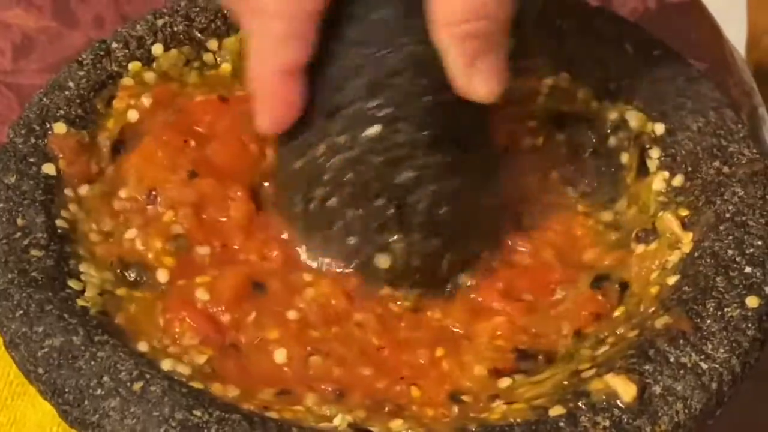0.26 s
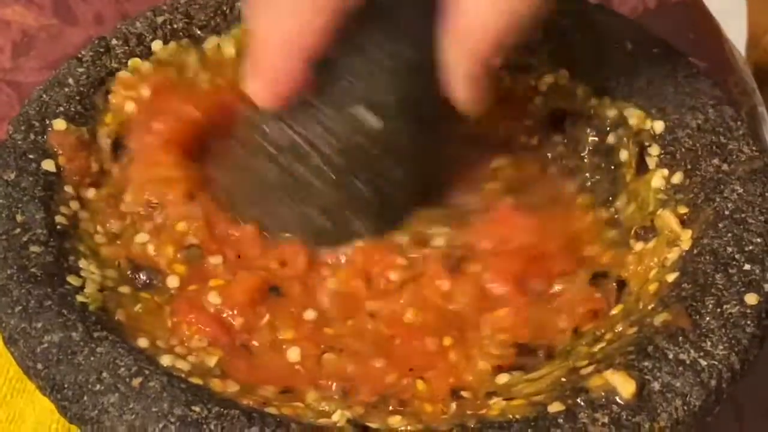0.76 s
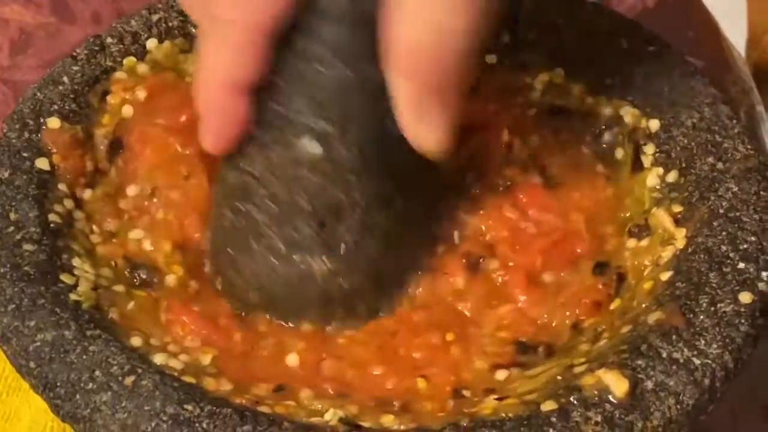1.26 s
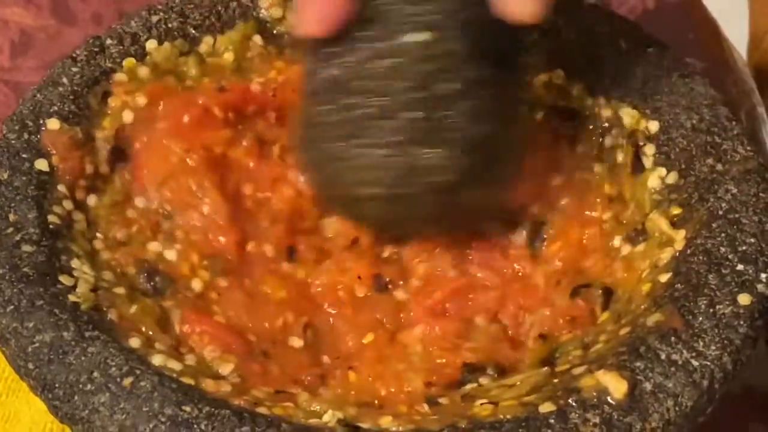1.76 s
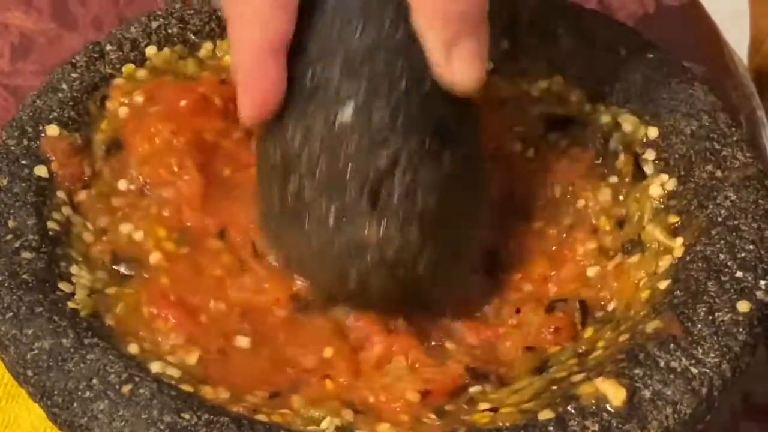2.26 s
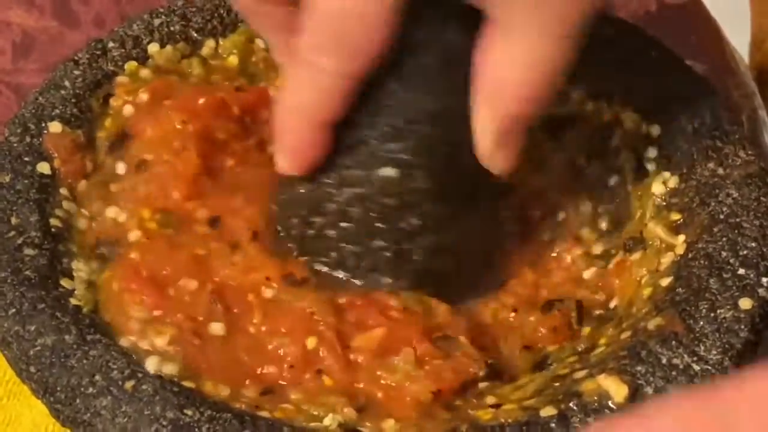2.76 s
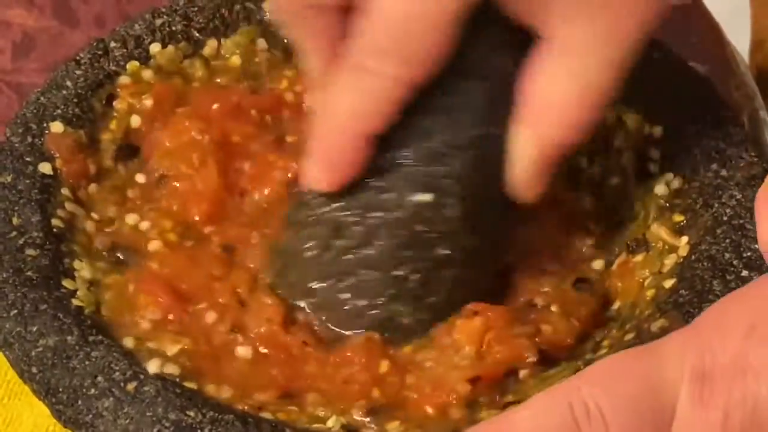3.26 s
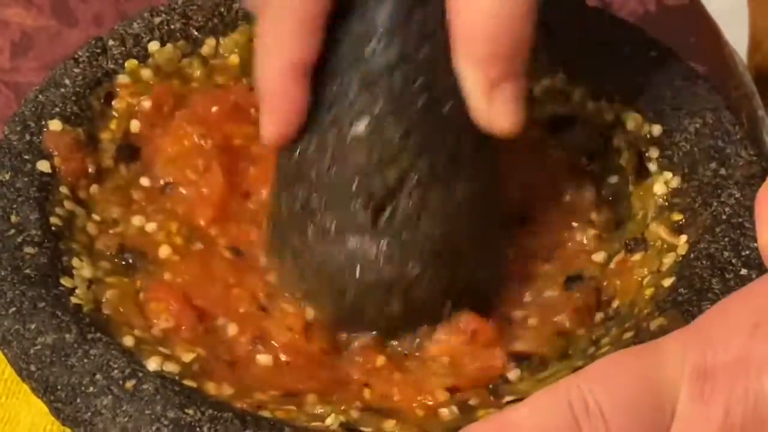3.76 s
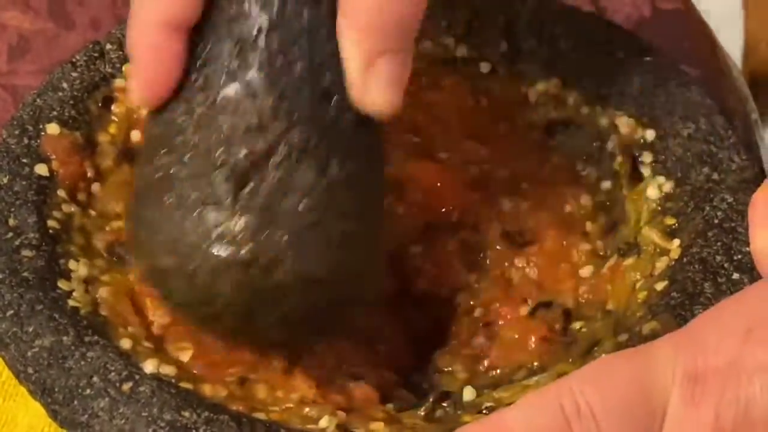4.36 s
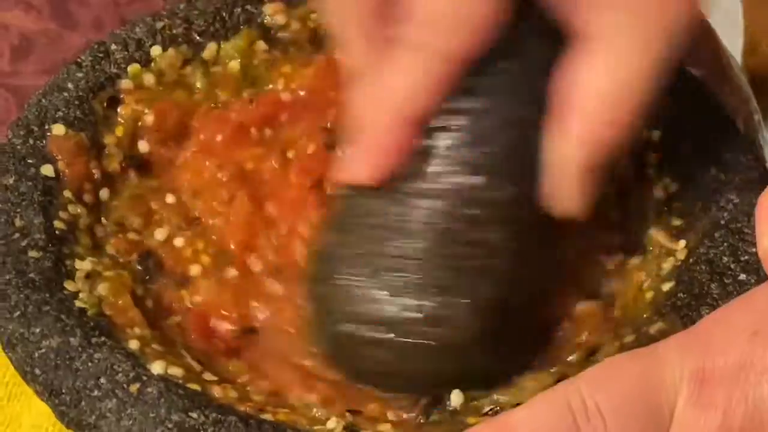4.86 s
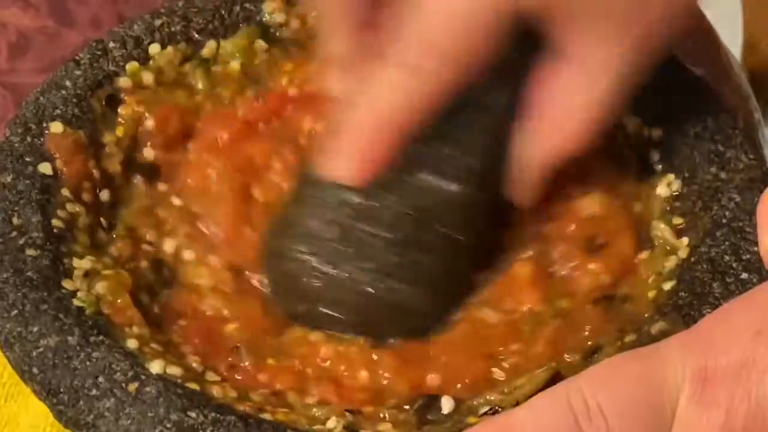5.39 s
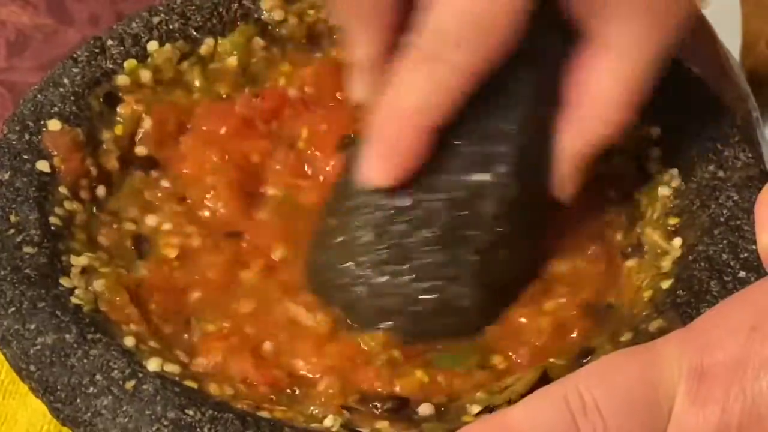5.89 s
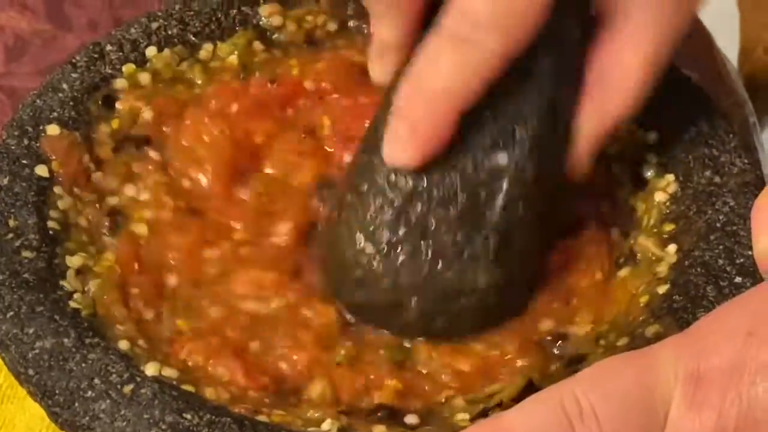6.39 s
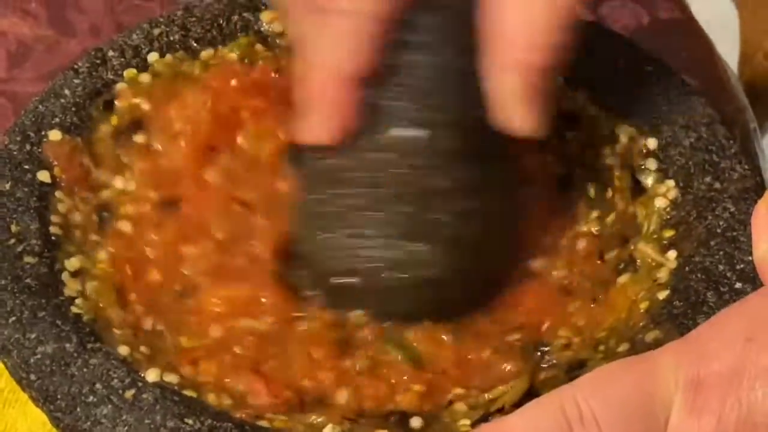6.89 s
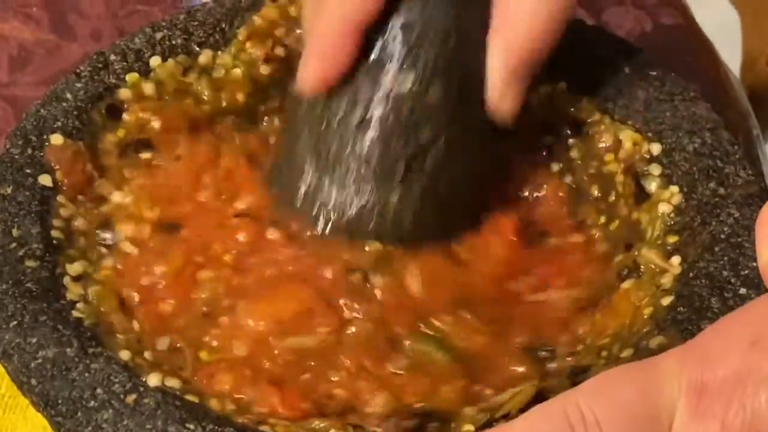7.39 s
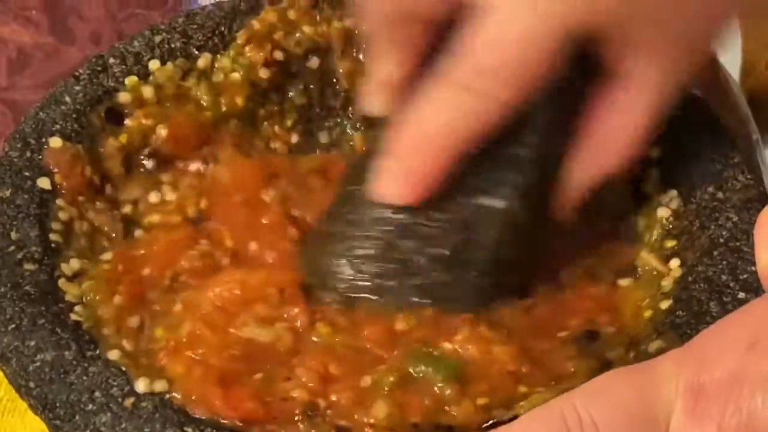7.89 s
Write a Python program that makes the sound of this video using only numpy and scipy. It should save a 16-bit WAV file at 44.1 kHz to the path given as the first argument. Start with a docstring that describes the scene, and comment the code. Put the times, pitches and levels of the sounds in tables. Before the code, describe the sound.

Uneven knocks of a stone pestle mashing salsa in a mortar turn harder and busier, with small wet pops and gritty scrapes.

```python
"""Pounding salsa in a stone mortar

A stone pestle pounds and grinds wet salsa in a stone mortar on a kitchen table.
Blows and rebounds ring damped stone and table modes; grit and seeds crack as short noise bursts.
Skids and drags excite the stone with dense clicks; rolling through pulp is duller click noise.
Bubbles and air pockets are decaying sines. Small-room echoes, rumble and hiss lie around it."""
import sys
import numpy as np
from scipy import signal
from scipy.fft import rfft, irfft, next_fast_len
from scipy.io import wavfile

SR = 44100
rng = np.random.default_rng(int(sys.argv[2]) if len(sys.argv) > 2 else 0)


def materialize(psi):
    """Save the field psi as 16-bit PCM at rate SR to the path in sys.argv[1].

    A 1-D psi becomes a single channel; in a 2-D psi each row is a channel.
    """
    bounded = np.clip(np.atleast_2d(psi).T, -1, 1)
    quanta = np.round(bounded * 32767).astype(np.int16)
    wavfile.write(sys.argv[1], SR, quanta)


N = 358974
TIME_S = np.arange(N) / SR

# low room rumble, relative spectrum: f/Hz, level/dB
RUMBLE_SPECTRUM = [(20, -5.5), (40, -4), (62, 0), (100, 0), (155, 3.5), (215, -10.5), (330, -7),
                   (480, -16.5), (700, -21.5), (1400, -54.5)]
# fine hiss, relative spectrum: f/Hz, level/dB
HISS_SPECTRUM = [(600, 2), (1000, 11.5), (1900, 4.5), (2700, 4.5), (5000, 9), (8000, 4), (12000, 7),
                 (16000, -1)]
# hiss over time: t/s, level/dB
HISS_LEVEL = [(0, -59.5), (2, -59), (3.8, -62.5), (5.4, -63), (8.14, -64.5)]
# kitchen echoes: f/Hz, relative level/dB, t60/s, left-right likeness (clipped to 0..1)
KITCHEN_ECHOES = [(60, -6, 0.95, 0.94), (150, -16.5, 0.48, 1), (352, -1.5, 0.43, 0.21),
                  (950, -5, 0.38, 0.25), (1700, -13.5, 0.46, 0.51), (2540, -8.5, 0.29, 1),
                  (5000, -8, 0.099, 1), (13350, -25.5, .15, 0.85)]
# stereo phase: f/Hz, phase by which left leads/rad
STEREO_PHASE = [(0, 0), (80, .1), (300, .19), (650, .05), (900, .25), (1400, 1.2), (1750, .5), (2100, 0),
                (7500, 0), (8440, -2.7), (9560, -3.5), (10500, -5.9), (11600, -6.5), (13200, -9.4),
                (15000, -12.6)]
# stereo balance of the direct sound: f/Hz, left minus right/dB
STEREO_BALANCE = [(60, .7), (160, 1.2), (300, .3), (600, 5), (1300, 2.5), (2000, .5), (2500, 0)]
# pulp squeezed out from under the pestle: t/s, level/dB
SQUEEZES = [(.69, -63), (1.59, -64), (2.74, -64), (2.92, -62), (5.06, -68), (5.72, -60.5), (7.72, -61)]
# large air pockets popping in the pulp: t/s, level before trim/dB, starting f/Hz
LARGE_POPS = [(1.777, -34.5, 1960), (1.8225, -36, 1000), (2.215, -44.5, 950), (2.356, -27.5, 4800),
              (2.3713, -35, 3000), (2.3957, -30, 1270), (3.8255, -43, 2080), (4.075, -33.5, 1280),
              (4.165, -23, 1700), (4.219, -30.5, 2130), (4.3245, -38, 3820), (5.0684, -37.5, 5000),
              (5.376, -34.5, 1257), (6.5095, -33.5, 4500), (7.62, -29, 3470), (7.8315, -29, 6750)]
# pestle rolling through pulp, relative spectrum: f/Hz, level/dB
RUB_SPECTRUM = [(120, -15), (300, 8), (480, 1.5), (800, -10), (1200, -13), (2000, -24.5), (5000, -38)]
# pestle dragging over bare stone: t/s, length/s, level/dB
DRAGS = [(3.874, 0.041, -37), (3.965, 0.021, -38.5), (4.404, 0.02, -35), (6.718, 0.027, -31.5),
         (6.898, 0.0077, -33), (6.968, 0.096, -43)]
# skids and drags, relative spectrum: f/Hz, level/dB
GRIT_SPECTRUM = [(300, 2), (950, 10), (1700, -3.5), (2750, -8.5), (4000, -9.5), (5500, 4), (10400, 11.5),
                 (16000, -13.5)]
# seeds cracking under the pestle: t/s, level/dB
SEEDS = [(1.135, -33), (2.395, -20.5), (4.3245, -33.5), (4.36, -29.5), (4.4125, -25.5), (5.2817, -23.5),
         (6.977, -32.5), (7.2546, -19)]
# ringing of bare stone: f/Hz, relative level/dB, t60/s
BARE_STONE_MODES = [(2721, 3, 0.018), (5500, -19.5, 0.018), (7800, -29, 0.0047), (10000, -25, .01)]
# mortar and pestle, damped by hand and pulp: f/Hz, relative level/dB, t60/s, pitch wander/share
STONE_MODES = [(330, -5.5, 0.019, 0.1), (720, 2.5, 0.0026, 0.023), (1000, -9.5, 0.0093, 0.07),
               (1298, -10.5, 0.0093, 0.072), (1728, -11, 0.016, 0.066), (2010, -8, 0.0047, 0.017)]
# table under the heavy mortar: f/Hz, relative level/dB, t60/s
TABLE_MODES = [(69, -2.5, 0.12), (99, -1.5, 0.2), (136.8, 8.5, 0.1), (160.2, 7.5, 0.12),
               (211.4, -10.5, 0.29), (283.4, -4, 0.1), (319.7, -9, 0.21), (414.8, -9, 0.3),
               (520, -6.5, 0.082)]
# pestle blows: t/s, table thump level before trim/dB, stone clack level/dB, hollow f/Hz, hardness f/Hz
BLOWS = [(0.012, -18, -10, 930, 1550), (0.3236, -15, -43, 330, 450), (0.358, -44, -37, 775, 1000),
         (0.417, -34.5, -36, 730, 1000), (0.762, -40, -48, 730, 1000), (1.1314, -21.5, -15, 780, 1190),
         (1.5082, -13, -13, 770, 1400), (1.933, -23, -19.5, 850, 1480), (2.087, -32.5, -52, 700, 1000),
         (2.682, -32.5, -44, 750, 1000), (2.8363, -29, -37.5, 740, 1000), (2.9186, -24.5, -32, 760, 1000),
         (3.1984, -24, -22, 900, 1050), (3.343, -30, -42, 780, 1000), (3.5387, -29.5, -30, 760, 930),
         (3.875, -9, -13.5, 780, 1800), (3.913, -13.5, -17, 760, 1210), (4.073, -23.5, -26, 1070, 1000),
         (4.1688, -24, -21.5, 676, 1000), (4.231, -25.5, -63.5, 720, 1000),
         (4.4054, -17.5, -16, 1295, 1800), (4.415, -22.5, -16.5, 330, 490), (4.4705, -18, -11.5, 825, 1250),
         (4.755, -7, -1, 949, 1830), (4.863, -25.5, -16, 762, 950), (4.961, -26, -31.5, 905, 1000),
         (5.0432, -30, -33.5, 754, 1000), (5.2797, -14, -14.5, 1284, 1375),
         (5.3816, -24.5, -23.5, 722, 1265), (5.5923, -8, -2.5, 957, 1890), (5.63, -28.5, -12.5, 870, 1240),
         (5.773, -29.5, -26.5, 827, 950), (5.8334, -23, -23.5, 910, 950), (6.087, -30, -69, 788, 893),
         (6.4355, -35, -34, 695, 1900), (6.6409, -10, -5.5, 904, 1500), (6.723, -17.5, -20.5, 850, 1260),
         (6.8973, -17, -14, 855, 1330), (6.985, -17, -24, 875, 1240), (7.053, -26, -35.5, 850, 1000),
         (7.2525, -14.5, -4, 1036, 1660), (7.6385, -18.5, -19, 717, 1000), (7.854, -28, -37, 950, 1000)]
# rebound and settling after every blow: delay/s, thump change/dB, clack change/dB
REBOUNDS = [(.038, -14, -25), (.098, -15.5, -25.5)]

RUMBLE_DB = -47.5
SQUEEZE_S = 0.071
POP_CYCLES = 22  # t60 in cycles of the starting pitch
SMALL_POPS_PER_S, SMALL_POP_DB, SMALL_POP_HZ = 3, -44.5, 4400  # level before trim; means of the spread
# roll: length, level after a 0 dB thump setting, dB per dB of thump
ROLL_S, ROLL_DB, ROLL_DB_PER_DB = 0.052, -30, 0.6
SKID_S, SKID_DB = 0.083, -35  # level re ring of bare stone
CRACK_DB = -22.5  # grit crushed by a blow, re its clack
# hard contact cuts through pulp: ring re clack at BARE_HZ, rise per octave of hardness
BARE_HZ, BARE_DB, BARE_DB_PER_OCTAVE = 1800, -11, 27
REBOUND_HARDNESS, REBOUND_JITTER = 0.7, 0.08  # share of blow hardness; delay deviation as a share


def from_db(db):
    """Decibels to gain."""
    return 10 ** (np.asarray(db) / 20)


def rms_one(x):
    """Scale to rms 1."""
    return x / np.sqrt(np.mean(x ** 2) + 1e-20)


def peak_one(x):
    """Scale to peak 1."""
    return x / np.max(np.abs(x))


def at_hz(points, hz, axis=1):
    """Read one table column on a log-frequency axis."""
    rows = np.array(points, float)
    return np.interp(np.log(hz + 1), np.log(np.abs(rows[:, 0]) + 1), rows[:, axis])


def filtered(x, response):
    """Pass x through a response given as a function of Hz."""
    size = next_fast_len(x.shape[-1] + SR // 10)
    spectrum = rfft(x, size) * response(np.fft.rfftfreq(size, 1 / SR))
    return irfft(spectrum, size)[..., :x.shape[-1]]


def coloured(x, spectrum):
    """Give x a spectrum; rms 1."""
    return rms_one(filtered(x, lambda hz: from_db(at_hz(spectrum, hz))))


def low_pass(x, hz, order=2):
    """Causal low-pass."""
    return signal.sosfilt(signal.butter(order, min(hz, 0.45 * SR), fs=SR, output="sos"), x)


def high_pass(x, hz, order=2):
    """Causal high-pass."""
    return signal.sosfilt(signal.butter(order, hz, "high", fs=SR, output="sos"), x)


def add(track, start_s, sound):
    """Mix a sound into a track at start_s."""
    start = max(0, round(start_s * SR))
    track[start:start + len(sound)] += sound[:max(0, N - start)]


def decay(t, t60_s):
    """Exponential fall of 60 dB in t60_s."""
    return np.exp(-np.log(1000) * t / t60_s)


def ring(t, hz, t60_s):
    """A struck mode: decaying sine."""
    return np.sin(2 * np.pi * hz * t) * decay(t, t60_s)


def strokes(rows):
    """Envelope of strokes that swell and fade: t/s, length/s, level/dB."""
    envelope = np.zeros(N)
    for start_s, length_s, db in rows:
        phase = np.linspace(-1, 1, max(3, int(length_s * SR)))
        add(envelope, start_s, from_db(db) * np.sqrt(1 - phase ** 2))
    return envelope


def grains(per_s, spread_db):
    """Random clicks of uneven size and either sign."""
    present = rng.random(N) < per_s / SR
    sign = rng.choice([-1, 1], N)
    return present * sign * from_db(spread_db * np.minimum(rng.exponential(1, N), 4))


def background(rumble_side_db=-16, hiss_side_db=-20):
    """Low room rumble and fine hiss: shaped noise, nearly the same left and right."""
    def air(spectrum, side_db):
        mid, side = coloured(rng.standard_normal((2, N)), spectrum)
        return mid + from_db(side_db) * side * [[1], [-1]]
    hiss_db = np.interp(TIME_S, *np.transpose(HISS_LEVEL))
    rumble = from_db(RUMBLE_DB) * air(RUMBLE_SPECTRUM, rumble_side_db)
    return rumble + from_db(hiss_db) * air(HISS_SPECTRUM, hiss_side_db)


def kitchen(x, gap_s=0.0017):
    """Diffuse echoes of a small room: stereo noise dying band by band."""
    t = TIME_S[:SR // 2]
    edges_hz = np.geomspace(45, 17000, 18)
    white, tail = rng.standard_normal((2, 2, len(t))), 0
    onset = np.clip(t / gap_s - 1, 0, 1)  # silent for one gap, full after two
    for k, band in enumerate(zip(edges_hz, edges_hz[1:])):
        hz = np.sqrt(band[0] * band[1])
        band_pass = signal.butter(2, band, "band", fs=SR, output="sos")
        mid, side = signal.sosfilt(band_pass, white[k % 2])  # neighbours use separate noise
        alike = np.clip(at_hz(KITCHEN_ECHOES, hz, axis=3), 0, 1)
        fade = decay(t, at_hz(KITCHEN_ECHOES, hz, axis=2)) * onset
        pair = np.sqrt((1 + alike) / 2) * mid + np.sqrt((1 - alike) / 2) * side * [[1], [-1]]
        tail = tail + from_db(at_hz(KITCHEN_ECHOES, hz)) * pair * fade / np.linalg.norm(fade)
    return signal.fftconvolve(x[None], tail, axes=1)[:, :N]


def squelching(per_s=1800, spread_db=1.5, cycles=9, low_hz=2600, high_hz=11000,
               idle_db=-67, churn_hz=7, churn_db=3):
    """Tiny bubbles ring as they burst; the level wanders as pulp churns and swells where squeezed."""
    pitches = 14
    clicks, dealt = grains(per_s, spread_db), rng.integers(0, pitches, N)
    bubbles = np.zeros(N)
    for k, hz in enumerate(np.geomspace(low_hz, high_hz, pitches)):
        bubble = ring(TIME_S[:SR // 50], hz, cycles / hz)
        bubbles += signal.oaconvolve(clicks * (dealt == k), bubble)[:N]
    squeezes = [(s, SQUEEZE_S, db) for s, db in SQUEEZES]
    churn = rms_one(low_pass(rng.standard_normal(N), churn_hz))
    return rms_one(bubbles) * (strokes(squeezes) + from_db(idle_db + churn_db * churn))


def pops(rise=0.3, rough=0.66, flutter_hz=900, spread_octaves=0.27, spread_db=3, trim_db=1):
    """An opening air pocket rings unevenly and rises in pitch as it dies; small ones open at random."""
    out, t = np.zeros(N), TIME_S[:SR // 10]
    times_s = TIME_S[rng.random(N) < SMALL_POPS_PER_S / SR]
    chances = rng.standard_normal((len(times_s), 2))
    small = [(s, SMALL_POP_DB + spread_db * a, SMALL_POP_HZ * 2 ** (spread_octaves * b))
             for s, (a, b) in zip(times_s, chances)]
    for s, db, hz in list(LARGE_POPS) + small:
        t60_s = POP_CYCLES / hz
        flutter = 1 + rough * rms_one(low_pass(rng.standard_normal(len(t)), flutter_hz))
        rising_t = t * (1 + rise * t / t60_s)
        add(out, s, from_db(db + trim_db) * flutter * ring(rising_t, hz, t60_s * (1 + rise)))
    return out


def rubbing(per_s=900, spread_db=3.0):
    """Dull little bumps as the pestle rolls over seeds and skins after each blow."""
    rolls = [(s, ROLL_S, ROLL_DB + ROLL_DB_PER_DB * thump_db) for s, thump_db, *_ in BLOWS]
    return strokes(rolls) * coloured(grains(per_s, spread_db), RUB_SPECTRUM)


def bare_db(clack_db, hard_hz):
    """How loudly a contact rings the bare stone."""
    return clack_db + BARE_DB + BARE_DB_PER_OCTAVE * np.log2(hard_hz / BARE_HZ)


def grinding(per_s=1100, spread_db=2.5):
    """Dense tiny slips under the skidding or dragging pestle keep the stone ringing."""
    t = TIME_S[:SR // 20]
    stone = sum(from_db(db) * ring(t, hz, t60_s)
                for hz, db, t60_s, *_ in STONE_MODES + BARE_STONE_MODES)
    rasp = signal.oaconvolve(grains(per_s, spread_db), stone)[:N]
    skids = [(s, SKID_S, bare_db(clack_db, hard_hz) + SKID_DB)
             for s, _, clack_db, _, hard_hz in BLOWS]
    return (strokes(skids) + strokes(DRAGS)) * coloured(rasp, GRIT_SPECTRUM)


def crunches(t60_s=0.0063, edge_hz=2600, top_hz=8500, lag_s=0.0016):
    """Grit under each blow and single seeds crack in bright noise bursts a few milliseconds long."""
    out, t = np.zeros(N), TIME_S[:SR // 20]
    grit = [(s + lag_s, clack_db + CRACK_DB) for s, _, clack_db, *_ in BLOWS]
    cracks = list(SEEDS) + grit
    bursts = high_pass(rng.standard_normal((len(cracks), len(t))), edge_hz)
    for (s, db), burst in zip(cracks, low_pass(bursts, top_hz)):
        add(out, s, from_db(db) * peak_one(burst * decay(t, t60_s)))
    return out


def pings(hits, lag_s=0.001367):
    """Bare stone rings briefly, louder under harder contacts."""
    out, t = np.zeros(N), TIME_S[:SR // 20]
    ping = peak_one(sum(from_db(db) * ring(t, hz, t60_s) for hz, db, t60_s in BARE_STONE_MODES))
    for s, _, clack_db, _, hard_hz in hits:
        add(out, s + lag_s, from_db(bare_db(clack_db, hard_hz)) * ping)
    return out


def thumps(hits, vary_db=2.5, soft_hz=600, softening=0.53, lag_s=0.003374, trim_db=1):
    """The weight of each contact rings the table; neighbouring modes swing against each other."""
    out, t = np.zeros(N), TIME_S[:SR // 3]
    modes = np.array([(-1) ** k * from_db(db) * ring(t, hz, t60_s)
                      for k, (hz, db, t60_s) in enumerate(TABLE_MODES)])
    strengths = from_db(vary_db * rng.standard_normal((len(hits), len(TABLE_MODES))))
    for (s, thump_db, clack_db, *_), strength in zip(hits, strengths):
        # a blow on pulp is slower than one on stone and misses the upper modes
        cutoff_hz = soft_hz * from_db(softening * (clack_db - thump_db))
        thud = low_pass(strength @ modes, cutoff_hz)
        add(out, s + lag_s, from_db(thump_db + trim_db) * peak_one(thud))
    return out


def clacks(hits, vary_db=1.2, hollow_t60_s=0.018, sharpness=2.17, bending=0.0834, lead_s=0.00045):
    """Stone meets stone: the hollow under the pestle rings at its pitch; pulp cushions the treble."""
    out, t = np.zeros(N), TIME_S[:SR // 20]
    chances = rng.standard_normal((len(hits), len(STONE_MODES), 2))
    for (s, _, clack_db, hollow_hz, hard_hz), chance in zip(hits, chances):
        # each spot of the bowl and each grip weights and shifts the modes differently
        stone = sum(from_db(db + vary_db * a) * ring(t, hz * (1 + wander * b), t60_s)
                    for (hz, db, t60_s, wander), (a, b) in zip(STONE_MODES, chance))
        hit = stone + ring(t, hollow_hz, hollow_t60_s)
        # springy contact: resonates at its hardness, passes little above
        hit = filtered(hit, lambda f: 1 / (1 - (f / hard_hz) ** 2 + 1j * f / (hard_hz * sharpness)))
        hit = low_pass(hit, 2 * hard_hz)
        # bending waves: delay/s = bending / sqrt(f/Hz), so the knock sweeps downward
        hit = filtered(hit, lambda f: np.exp(-4j * np.pi * bending * np.sqrt(f)))
        add(out, s - lead_s, from_db(clack_db) * peak_one(hit))
    return out


def contacts():
    """Every blow and its softer rebounds, in the columns of BLOWS."""
    rows = []
    for blow, chance in zip(BLOWS, rng.standard_normal((len(BLOWS), len(REBOUNDS)))):
        s, thump_db, clack_db, hz, hard_hz = blow
        rows.append(blow)
        for (delay_s, thump_change_db, clack_change_db), late in zip(REBOUNDS, chance):
            rebound_s = s + delay_s * (1 + REBOUND_JITTER * late)
            rows.append((rebound_s, thump_db + thump_change_db, clack_db + clack_change_db,
                         hz, hard_hz * REBOUND_HARDNESS))
    return rows


def scene():
    """The mortar stands close and a little to the left, with room echoes and background."""
    hits = contacts()
    mortar = thumps(hits) + clacks(hits) + pings(hits) + crunches()
    mortar = mortar + grinding() + rubbing() + squelching() + pops()
    direct = filtered(mortar, lambda hz: from_db(at_hz(STEREO_BALANCE, hz) * [[0.5], [-0.5]]))
    return direct + kitchen(mortar) + background()


def record(dry, low_cut_hz=38, top_cut_hz=16200):
    """Left and right differ in phase, most in the treble; the deepest bass and the top are cut."""
    pair = filtered(dry, lambda hz: np.exp(1j * at_hz(STEREO_PHASE, hz) * [[0], [-1]]))
    pair = high_pass(pair, low_cut_hz, order=3)
    return signal.sosfilt(signal.ellip(10, 0.1, 80, top_cut_hz, fs=SR, output="sos"), pair)


dry = scene()
out = record(dry)
materialize(out)
```